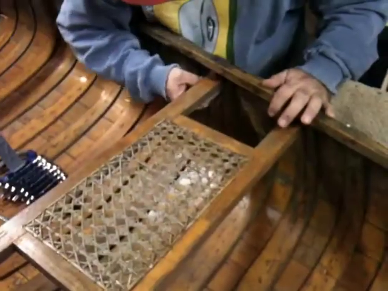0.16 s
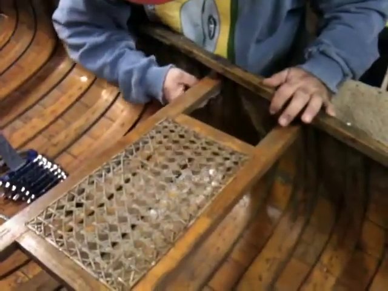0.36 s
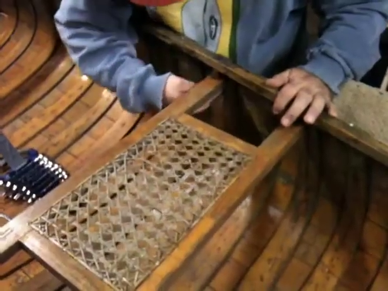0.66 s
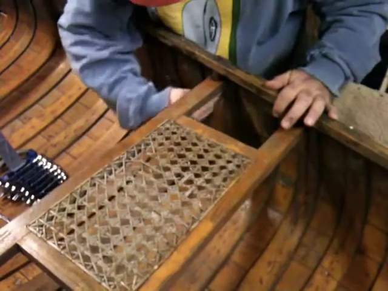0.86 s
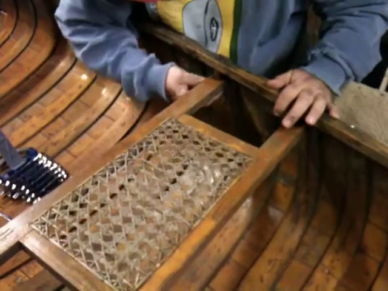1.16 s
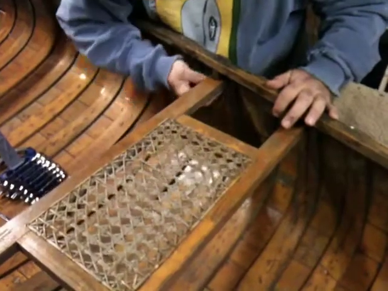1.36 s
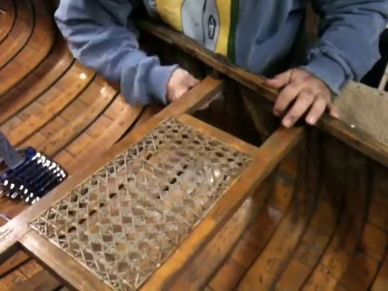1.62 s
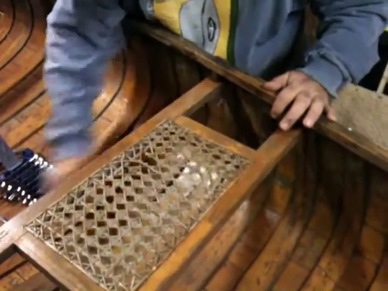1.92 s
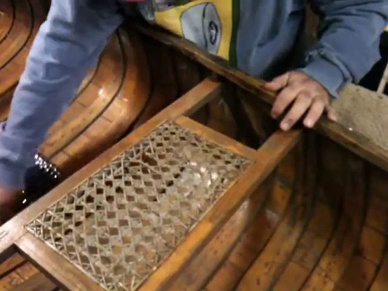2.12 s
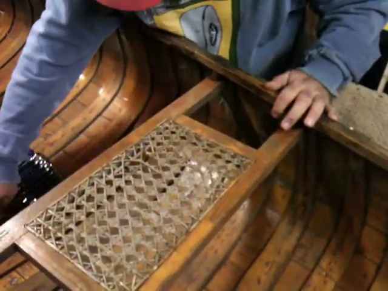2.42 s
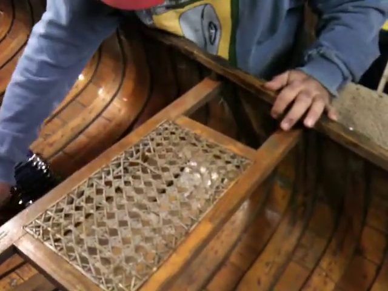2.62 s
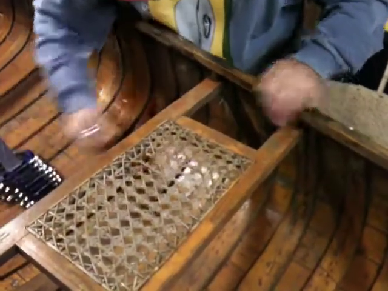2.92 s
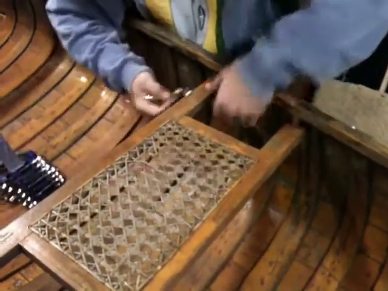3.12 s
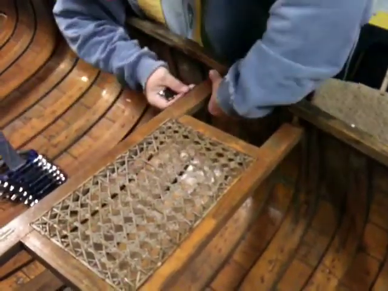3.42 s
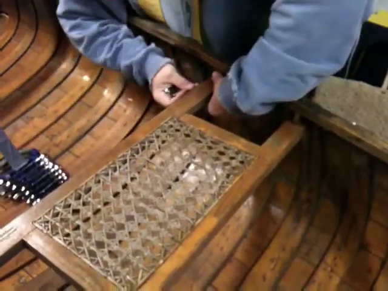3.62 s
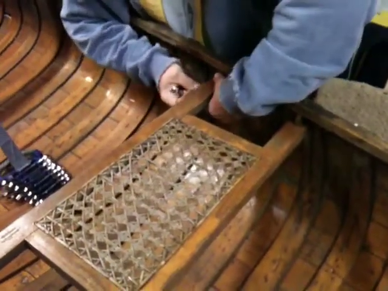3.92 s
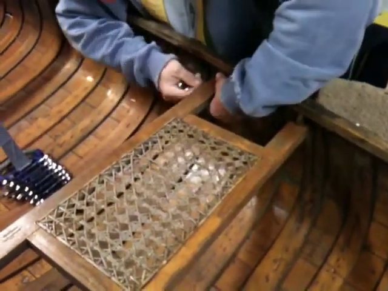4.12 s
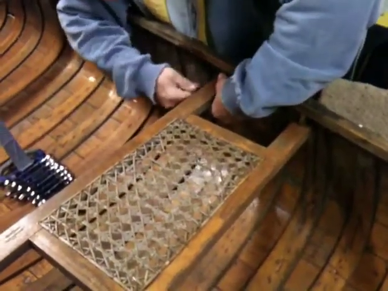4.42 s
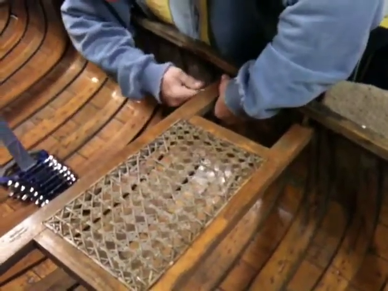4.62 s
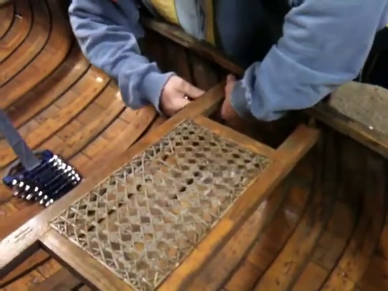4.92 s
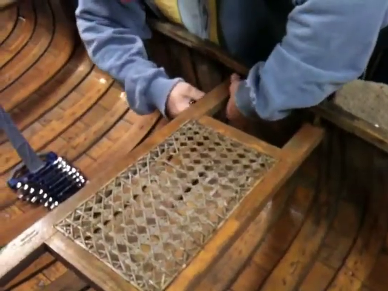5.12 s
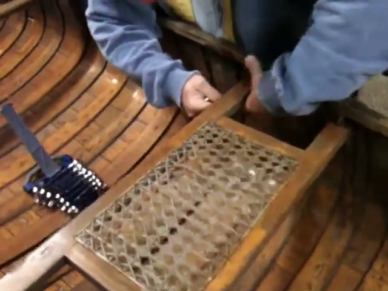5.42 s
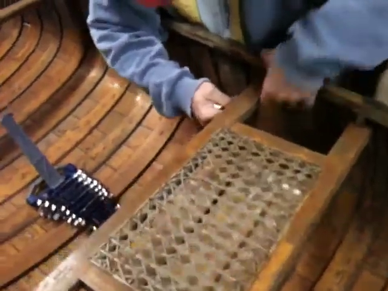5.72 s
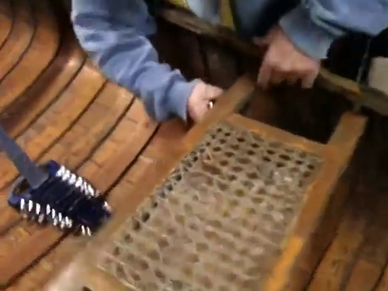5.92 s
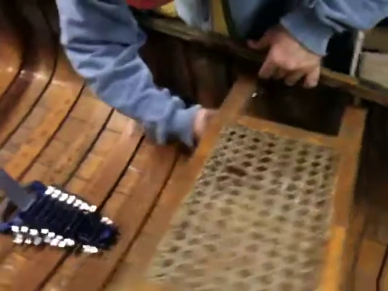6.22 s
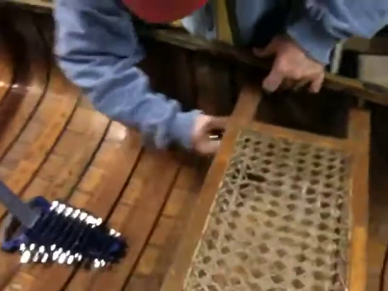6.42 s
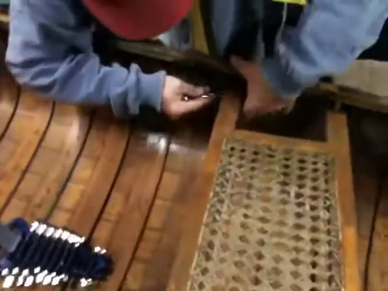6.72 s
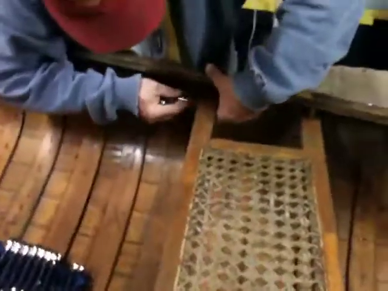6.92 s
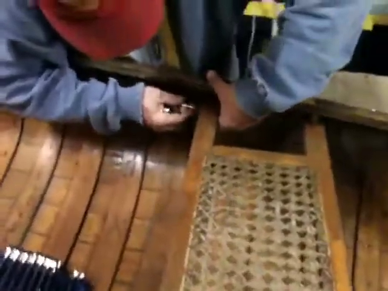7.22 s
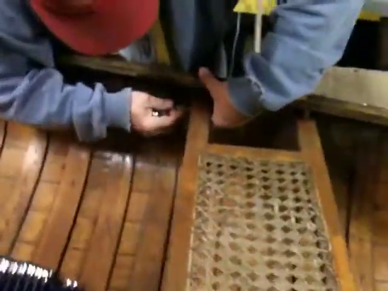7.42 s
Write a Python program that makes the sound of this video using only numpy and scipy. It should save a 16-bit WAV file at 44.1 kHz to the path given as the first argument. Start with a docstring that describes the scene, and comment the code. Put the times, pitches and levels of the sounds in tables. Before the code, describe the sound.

Close in a small workshop, a wooden frame knocks unevenly against a resonant planked hull. After faint taps and one firm knock, a flurry of knocks comes with a steel tool rattling out and clinking, peaking in a bright high ping. Sharp cracking knocks follow, then a quieter stretch of rustle and light taps, and finally another loose run of hard knocks. Sleeves brush the wood over faint room hiss.

```python
"""In a small workshop, a caned seat frame is being fitted into a wooden canoe.
The frame knocks against the planked hull: ringing tones, filtered noise, deep throbs and sharp snaps.
A steel wrench and a bolt are picked up, rattle and clink: each hit is a set of fading sine tones.
Sleeves brush over the wood: noise that follows the moving arm. A short echo and a quiet hiss with
soft drones make the room."""
import sys
import numpy as np
from scipy import signal
from scipy.io import wavfile

SR = 44100
rng = np.random.default_rng(int(sys.argv[2]) if len(sys.argv) > 2 else 0)


def unload_wav(signal):
    """Save mono or channel-first audio to the path in sys.argv[1] as 16-bit WAV at rate SR, clipped to [-1, 1]."""
    wavfile.write(
        sys.argv[1],
        SR,
        np.round(np.clip(np.atleast_2d(signal).T, -1, 1) * 32767).astype(np.int16),
    )


N = 333396
CENTRES = np.geomspace(34, 15000, 27)  # middles of the noise bands [Hz]
RING_N = SR // 2  # longest single sound [samples]
RING_TIME = np.arange(RING_N) / SR  # [s]


def from_db(db):
    """Turn decibels into a gain."""
    return 10 ** (np.asarray(db) / 20)


def rms_one(x):
    """Scale a sound to an average (rms) level of 1."""
    return x / np.sqrt(np.mean(x ** 2))


def at_hz(points, hz):
    """Read a table of (frequency, value) between its points, on a log-frequency axis."""
    f, value = np.transpose(points)
    return np.interp(np.log(hz), np.log(f), value)


def fade(t, t60):
    """Free decay: the sound is 60 dB down after t60 seconds."""
    return np.exp(-np.log(1000) * t / t60)


def add(out, s, sound):
    """Mix a sound in at s seconds."""
    start = int(s * SR)
    out[start:start + len(sound)] += sound[:N - start]


def noise_bands():
    """Make third-octave bands of unrelated noise, rms 1 each."""
    edge = np.sqrt(CENTRES[1] / CENTRES[0])
    bands = []
    for hz in CENTRES:
        band_filter = signal.butter(3, [hz / edge, hz * edge], "band", fs=SR, output="sos")
        bands.append(rms_one(signal.sosfilt(band_filter, rng.standard_normal(N))))
    return np.array(bands)


def coloured_noise(table, bands):
    """Mix the noise bands at the levels of a table."""
    return from_db(at_hz(table, CENTRES)) @ bands


def flutter(rate):
    """Random wobble around 0: straight lines between random points, `rate` points per second."""
    knots = rng.standard_normal(4096)
    return np.interp(np.arange(N) / SR * rate, np.arange(len(knots)), knots)


def resonate(x, hz, q):
    """A resonance passes the sound near one pitch, with gain 1 at its top."""
    return signal.lfilter(*signal.iirpeak(hz, q, fs=SR), x)


def ringing(modes, gains, length):
    """A struck object rings as decaying sines, each starting upward or downward at random."""
    hz, _, t60 = np.transpose(modes)
    signs = rng.choice([-1, 1], len(hz))
    sines = np.sin(2 * np.pi * hz[:, None] * RING_TIME)
    return (gains * signs) @ (sines * fade(RING_TIME, t60[:, None] * length))


# Blows of frame and hands on the hull: (time [s], body level [dB], clack re body [dB],
# crack re body [dB], resonance of the struck spot [Hz], its lift [dB])
KNOCKS = [(0.093, -66, 15.5, 5, 2060, 14.5), (0.386, -53, -15, -16, 178, 23),
          (0.56, -43, -6, -10.5, 990, 12.5), (.622, -42, -14, -14, 450, 0),
          (.894, -44, -1.5, -11, 422, 2.5), (1.015, -26, 1.5, 1, 392, 7), (1.021, -35.5, -11, -21, 182, 13),
          (1.223, -57, 2, -3, 210, 20), (1.367, -48, 4, -17, 1520, 3), (1.487, -63, -23, -20, 240, 19),
          (1.544, -55, -5, 2, 1170, 21), (1.62, -41, -0.5, -6, 1000, 16),
          (1.684, -38.5, -9.5, -0.5, 1050, 19), (2.156, -32.5, -17, -11.5, 232, 8.5),
          (2.171, -38, -2.5, -36, 1470, 9.5), (2.285, -41, -11.5, -1, 845, 18.5),
          (2.448, -42, 3.5, 12.5, 1390, 14), (2.483, -29.5, 3.5, 2.5, 850, 5), (2.512, -35, -1, 2, 660, 14),
          (2.556, -32, -3.5, -9, 1760, 11), (2.677, -35.5, -7.5, -5.5, 894, 13.5),
          (2.683, -35.5, -27, -26, 298, 18), (2.73, -40, -20, -30, 282, 8),
          (3.594, -44, -11, -7, 1050, 17.5), (3.851, -30, -1, 2, 507, 12), (3.881, -32, 0, 12, 387, 10),
          (3.887, -34.5, -4.5, 4.5, 744, 20.5), (3.9651, -28.5, -5, 6, 730, 6),
          (4.034, -28.5, 4.5, -3, 616, 2.5), (4.148, -54, 8, 19, 1070, 14),
          (4.394, -29, -13, -9, 884, 10.5), (4.398, -38, -10, -28, 235, 14), (5.117, -50, -18, -12, 260, 9),
          (5.324, -48.5, -18, -24.5, 545, 1), (5.601, -53, 2, -12.5, 1200, 10.5),
          (5.744, -46, -9.5, -6, 277, 13.5), (5.819, -37, -9.5, 1, 288, 2),
          (5.894, -36.5, -32, -37, 259, 13), (6.2302, -33.5, 7, 7, 970, 3), (6.26, -32.5, 2.5, -7, 374, 7),
          (6.321, -34.5, 5, -15, 370, 13.5), (6.335, -42.5, -2, -30, 650, 20.5),
          (6.396, -48.5, 10.5, -38, 513, 14.5), (6.697, -33, 2.5, 8, 432, 12),
          (6.722, -35, 0.5, 3.5, 434, 1), (6.846, -28.5, 1.5, 11, 433, 5.5),
          (7.02, -36, -4.5, -15, 254, 12.5), (7.085, -51.5, 5, 1, 594, 11),
          (7.308, -50.5, -2.5, -4, 221, 21.5), (7.359, -48, -3, -6, 201, 11),
          (7.456, -42, -0.5, -10, 268, 11)]
# Low modes of hull and frame: (frequency [Hz], level [dB], t60 when not held [s])
HULL_MODES = [(180.4, -10, 0.28), (228.4, 2.5, 0.11), (287, 5.5, 0.098), (313, 1.5, 0.14), (372, 7.5, 0.13),
              (397.5, 0, 0.11), (435.4, 1, 0.24), (508.6, -0.5, 0.33), (574, -0.5, 0.31),
              (616, -11.5, 0.18), (643.7, 1, 0.13), (726, -2.5, 0.25), (792, -3.5, 0.29),
              (889.5, 5.5, 0.14), (973.5, 4.5, 0.13), (1061, -9, 0.28), (1410, -10.5, 0.091),
              (1522, -18, 0.13), (1740, -5.5, 0.17), (2080, 3.5, 0.096), (2180, -9, 0.32)]
# Crowded higher modes of the planking: (frequency [Hz], level per band [dB])
PLANK_LEVELS = [(60, -22.5), (110, -25), (180, -2.5), (400, -2), (700, -4), (1200, 1), (2100, 0.5),
                (3300, -6), (4700, -5), (7000, -3.5), (9500, -4), (12000, -13.5), (15500, -17.5)]
# How long the planking rings: (frequency [Hz], t60 when not held [s])
PLANK_DECAY = [(100, 0.22), (260, 0.32), (700, 0.24), (1840, 0.21), (4850, 0.18), (12800, 0.1)]
HELD_RING = 0.91  # share of its ring time that the hull keeps under the hands


def knocks(bands, modes_db=-15, planks_db=-16.0, crack_db=5, crack_s=0.0065, swell_s=0.0028,
           swell_cycles=0.95, scatter_db=3.0, body_hz=450, clack_hz=1300, crack_hz=5500, spot_q=6.76):
    """Each blow rings the hull's low modes and the dense plank modes; harder contacts reach higher."""
    out, t = np.zeros(N), RING_TIME
    mode_hz, mode_db, _ = np.transpose(HULL_MODES)
    hz = CENTRES[:, None]
    # each band swells over a few cycles as it spreads through the hull
    swell = 1 - np.exp(-t * hz / swell_cycles)
    # the contact adds a short crack, strongest in the high bands
    crack = 1 + from_db(crack_db) * hz / (hz + 2000) * np.exp(-t / crack_s)
    shape = swell * crack * fade(t, at_hz(PLANK_DECAY, hz) * HELD_RING)
    for s, body_db, clack_db, crack_rel_db, spot_hz, lift_db in KNOCKS:
        force = [(body_hz, body_db), (clack_hz, body_db + clack_db), (crack_hz, body_db + crack_rel_db)]
        start = rng.integers(N - RING_N)
        dense = bands[:, start:start + RING_N] * shape
        # give every band the same energy as its shape, whatever piece of noise was drawn
        dense *= np.sqrt(np.sum(shape ** 2, axis=1) / np.sum(dense ** 2, axis=1))[:, None]
        planks = from_db(planks_db + at_hz(PLANK_LEVELS, CENTRES) + at_hz(force, CENTRES)) @ dense
        scatter = scatter_db * rng.standard_normal(len(mode_hz))
        strengths = from_db(modes_db + mode_db + at_hz(force, mode_hz) + scatter)
        low_modes = ringing(HULL_MODES, strengths, HELD_RING) * (1 - np.exp(-t / swell_s))
        blow = planks + low_modes
        # the struck spot colours the blow with a resonance of its own
        spot = (from_db(lift_db) - 1) * resonate(blow, spot_hz, spot_q)
        add(out, s, blow + spot)
    return out


def thumps(thump_db=-2, thump_hz=200, thump_t60=.035, radiate_hz=125):
    """Each blow also shoves the whole hull, which gives one short, heavy throb."""
    out = np.zeros(N)
    throb = np.sin(2 * np.pi * thump_hz * RING_TIME) * fade(RING_TIME, thump_t60)
    for s, body_db, *_ in KNOCKS:
        add(out, s, from_db(body_db + thump_db) * throb)
    # an open shell radiates little deep bass
    return signal.sosfilt(signal.butter(2, radiate_hz, "high", fs=SR, output="sos"), out)


# The frame slips off its bearing and a rail snaps: (time [s], level [dB], pitch [Hz])
SNAPS = [(1.0157, -27, 3040), (1.0147, -35, 4230), (3.851, -37.5, 2130), (3.882, -30, 2230),
         (3.9647, -30, 5030), (4.0347, -37.5, 5640), (6.2311, -34, 1510), (6.724, -33, 4800),
         (6.8438, -29.5, 4770)]


def snaps(q=10.0, t60=0.068):
    """A brief burst of slips, made of noise, rings one resonance of a rail."""
    out = np.zeros(N)
    for s, level_db, hz in SNAPS:
        noise = rng.standard_normal(RING_N)
        slips = rms_one(resonate(resonate(noise, hz, q / 2), hz, q / 2))
        add(out, s, from_db(level_db) * slips * fade(RING_TIME, t60))
    return out


# Touches of the wrench: (time [s], level [dB], most excited frequency [Hz],
# loss away from it [dB per octave], ring length [factor])
CLINKS = [(2.4485, -27, 7900, 26, 1.8), (2.467, -22, 8050, 32, 0.81), (2.553, -31, 12380, 5, 0.39),
          (2.5579, -20, 7900, 21, 0.4), (2.564, -30, 14000, 43, 0.56), (2.643, -25, 7300, 66, 0.099),
          (2.8176, -24, 11000, 2.5, 0.43), (3.09, -36, 10500, 4, 0.82), (3.227, -14, 8810, 15.5, 0.4),
          (3.327, -7.5, 9000, 65.5, .28), (3.5148, -37, 7700, 12, 0.32), (3.5807, -50.5, 4200, 10, 0.7),
          (3.7224, -43, 7900, 11, 0.31), (4.15, -42, 11570, -0.5, .62), (4.395, -44.5, 13630, 29, 0.6),
          (6.24, -27, 8050, 100, 0.35), (6.847, -18.5, 7900, 106, 0.4)]
# Ringing modes of the wrench: (frequency before detuning [Hz], level [dB], t60 before the factor [s])
WRENCH_MODES = [(3780, -11.5, 0.1), (4160, -3, .07), (4000, -13, 0.23), (4260, -18, 0.059),
                (4700, -16.5, .04), (7330, -17.5, 0.064), (7400, -16, 0.4), (7970, -1, 0.11),
                (7990, -6, 0.134), (8410, -14, 0.09), (8800, -25, .16), (9034, 2.5, 0.16),
                (10000, -14.5, 0.058), (9550, -11, .13), (10030, -10, 0.099), (11000, -11.5, 0.06),
                (11150, -3.5, 0.1134), (13080, -18.5, 0.078), (13240, -3, 0.16), (13820, -6, .09),
                (14780, -15, 0.11)]
# Colour of steel meeting steel: (frequency [Hz], level per band [dB])
TICK = [(50, -40.5), (700, -25), (2000, -26.5), (3100, -21), (4200, -5), (5500, -19.5), (7500, 0.5),
        (9300, 1.5), (12000, -3), (15000, -7.5)]
# tick re ring; the more a contact favours one mode, the less it ticks
TICK_DB, TICK_LOSS_OCTAVES = -4.5, 0.49
BOUNCE_S, BOUNCE_DB = 0.0084, -11.5  # one chatter after each touch: delay, level re the touch


def wrench(bands, ring_db=-2.0, tick_t60=0.043, most_loss_db=22, grip_detune=0.0028,
           scatter_db=4.0, contact_s=0.00085):
    """Steel on steel ticks, then rings the modes the contact favours, damped and detuned by the grip."""
    out, t = np.zeros(N), RING_TIME
    hz, mode_db, t60 = np.transpose(WRENCH_MODES)
    tick = rms_one(coloured_noise(TICK, bands))
    soft_start = 1 - np.exp(-t / contact_s)
    for s, level_db, focus_hz, slope_db, length in CLINKS:
        loss_db = np.minimum(slope_db * np.abs(np.log2(hz / focus_hz)), most_loss_db)
        tick_gain = from_db(TICK_DB - TICK_LOSS_OCTAVES * slope_db)
        for delay, touch_db in ((0, level_db), (BOUNCE_S, level_db + BOUNCE_DB)):
            gains = from_db(mode_db - loss_db + scatter_db * rng.standard_normal(len(hz)))
            gains /= np.linalg.norm(gains)
            held_hz = hz * (1 + grip_detune * rng.standard_normal(len(hz)))
            held_modes = np.column_stack([held_hz, mode_db, t60])
            ring = from_db(ring_db) * ringing(held_modes, gains, length)
            start = rng.integers(N - RING_N)
            contact = tick_gain * tick[start:start + RING_N] * fade(t, tick_t60)
            add(out, s + delay, from_db(touch_db) * (ring + contact) * soft_start)
    return out


RATTLE_START_S, RATTLE_S = 2.45, 0.14  # the wrench is dragged out from beside the bolt
# small contacts: number per second, level of the faintest, ring time [s]
RATTLE_PER_S, RATTLE_DB, RATTLE_T60 = 290, -49, 0.0094
RATTLE_LOW_HZ, RATTLE_HIGH_HZ = 2500, 7000  # range of their pitches


def rattle(size_db=4):
    """Dragged steel chatters on the planks: many tiny contacts, each a short ring at its own pitch."""
    out, t = np.zeros(N), np.arange(RING_N // 10) / SR
    for when, pitch, size in rng.random((int(RATTLE_PER_S * RATTLE_S), 3)):
        hz = RATTLE_LOW_HZ * (RATTLE_HIGH_HZ / RATTLE_LOW_HZ) ** pitch
        # many contacts are faint, a few are strong
        gain = from_db(RATTLE_DB - size_db * np.log(1 - size))
        ring = np.sin(2 * np.pi * hz * t) * fade(t, RATTLE_T60)
        add(out, RATTLE_START_S + when * RATTLE_S, gain * ring)
    return out


def hull_echoes(x, echo_db=-7, t60=0.14, delay_s=0.0038):
    """The varnished hull throws steel sounds back and forth (a fading noise tail), so they shimmer."""
    echoes = rng.standard_normal(RING_N) * fade(RING_TIME, t60) * (RING_TIME > delay_s)
    echoes /= np.linalg.norm(echoes)
    return x + from_db(echo_db) * signal.fftconvolve(x, echoes)[:N]


# Nudges of the loose bolt: (time [s], level [dB])
BOLT_HITS = [(2.4501, -26.5), (2.556, -52)]
# Ringing modes of the bolt: (frequency [Hz], level [dB], t60 [s])
BOLT_MODES = [(1560, -7.5, 0.19), (1710, -21, 0.12), (3876, -7.5, .1), (6143, -19.5, 0.46),
              (6330, -8.5, .33), (6440, -25, .17), (9500, -15, 0.13), (9500, 4.5, 0.24),
              (11865, -13.5, .18), (13200, -8.5, 0.14), (13350, -20, .13), (13740, -16.5, .14),
              (15284, -28, 0.16)]


def bolt():
    """The loose bolt is nudged and rings freely, as a set of fading sines."""
    out = np.zeros(N)
    mode_db = np.array(BOLT_MODES)[:, 1]
    for s, level_db in BOLT_HITS:
        add(out, s, ringing(BOLT_MODES, from_db(level_db + mode_db), 1))
    return out


MOVE_CREST, MOVE_ROUNDNESS = 0.39, 0.61  # share of a move at which it is fastest; how soft its ends are


def arm_speed(length):
    """A move gathers speed, crests at 1 and comes to rest."""
    count = int(length * SR)
    phase = np.interp(np.arange(count) / count, [0, MOVE_CREST, 1], [0, np.pi, 0])
    return np.sin(phase / 2) ** MOVE_ROUNDNESS


# fibres snag and let go: average rate, average size re the rustle, time constant of the decay
CATCHES_PER_S, CATCH_DB, CATCH_S = 57, -6, 0.0012


def catches():
    """Snagging fibres give short random flares of friction, as a gain that rises from 1."""
    snags = (rng.random(N) < CATCHES_PER_S / SR) * rng.exponential(1, N)
    flares = signal.lfilter([1], [1, -np.exp(-1 / (CATCH_S * SR))], snags)
    return 1 + from_db(CATCH_DB) * flares


# An arm slides or shifts its weight on the hull:
# (start time [s], length [s], sleeve rustle level [dB], hull rumble level [dB])
MOVES = [(.75, 0.45, -79, -67), (1.46, 0.36, -94, -58), (2.126, 0.37, -71, -60.5), (2.32, 0.42, -56.5, -61),
         (2.586, 0.32, -73, -52.5), (2.878, 0.25, -53, -55.5), (3.297, 0.19, -55, -60.5),
         (3.48, 0.26, -74.5, -63), (5.4, 0.13, -64.5, -57.5), (5.535, 0.21, -61.5, -59),
         (5.734, 0.19, -65, -54), (5.872, 0.16, -60.5, -65), (6.034, 0.32, -60.5, -61),
         (6.29, 0.2, -66.5, -61.5), (6.423, 0.087, -64.5, -68), (6.663, 0.34, -71.5, -53.5),
         (6.94, 0.5, -70, -61.5), (7.437, .12, -60.5, -55)]
# Light scuffs of fingers and cuffs: (time [s], level before the swell and fade [dB], fade time constant [s])
SCUFFS = [(0.088, -48.5, 0.021), (1.435, -62, 0.014), (3.375, -52, 0.0083), (3.424, -44.5, 0.01),
          (3.832, -54, 0.0099), (5.005, -52.5, 0.012), (5.413, -55.5, 0.05), (5.842, -56, 0.0038),
          (5.937, -53, 0.03), (6.177, -45, 0.021), (6.466, -47, 0.031), (7.15, -57, 0.009),
          (7.271, -54, 0.014)]
# Colour of the rubbing cloth: (frequency [Hz], level per band [dB])
CLOTH = [(50, -37), (500, -22), (1500, 1.5), (3000, -1.5), (5000, 1.5), (9000, 7), (12000, 1.5),
         (15500, -1)]
# Colour of the hull's answer: (frequency [Hz], level per band [dB])
RUMBLE = [(35, -48), (60, -31.5), (90, -11), (125, -11.5), (190, 9), (330, 7.5), (600, 2.5), (1200, -3),
          (2500, -21), (5000, -34.5)]
RESTING_RUSTLE_DB, RESTING_RUMBLE_DB = -76, -68  # hands that only hold on


def rubbing(bands, grain_db=1.0, lumps_db=3.5):
    """Cloth and skin catch in fine grains and the hull rumbles in lumps; both follow the arm's speed."""
    t = RING_TIME
    rustle = np.full(N, from_db(RESTING_RUSTLE_DB))
    rumble = np.full(N, from_db(RESTING_RUMBLE_DB))
    for s, length, rustle_db, rumble_db in MOVES:
        speed = arm_speed(length)
        add(rustle, s, from_db(rustle_db) * speed)
        add(rumble, s, from_db(rumble_db) * speed)
    for s, level_db, length in SCUFFS:
        swell = 1 - np.exp(-4.0 * t / length)
        add(rustle, s, from_db(level_db) * swell * np.exp(-t / length))
    grains = from_db(grain_db * flutter(240)) * catches()
    cloth = rms_one(coloured_noise(CLOTH, bands)) * grains
    hull = rms_one(coloured_noise(RUMBLE, bands)) * from_db(lumps_db * flutter(25))
    return rustle * cloth + rumble * hull


def workshop(x, wet_db=-17, t60=0.22, delay_s=0.011, wall_hz=5000):
    """The walls send back a short tail of fading noise, dulled above wall_hz."""
    tail = rng.standard_normal(RING_N) * fade(RING_TIME, t60) * (RING_TIME > delay_s)
    tail /= np.linalg.norm(tail)
    tail = signal.sosfilt(signal.butter(1, wall_hz, fs=SR, output="sos"), tail)
    return x + from_db(wet_db) * signal.fftconvolve(x, tail)[:N]


# Colour of the steady room hiss: (frequency [Hz], level per band [dB])
ROOM = [(35, -112), (55, -101), (85, -88), (130, -78.5), (250, -73.5), (600, -72.5), (1300, -72),
        (2000, -72.5), (3000, -79.5), (5000, -80.5), (8000, -79), (12000, -81), (15500, -82)]
# Pitches at which the room tone drones: (frequency [Hz], level [dB])
DRONE = [(120, -79), (176, -73), (365, -77), (563, -73.5), (1970, -76.5)]


def room_tone(drone_q=25):
    """Even hiss, with soft drones made by passing noise through narrow resonances."""
    out = coloured_noise(ROOM, noise_bands())
    for hz, level_db in DRONE:
        noise = rng.standard_normal(N)
        drone = resonate(resonate(noise, hz, drone_q), hz, drone_q)
        out += from_db(level_db) * rms_one(drone)
    return out


def scene():
    """Knocks, clinks and rubbing over the room tone."""
    bands = noise_bands()
    wood = knocks(bands) + thumps() + snaps()
    steel = hull_echoes(wrench(bands) + rattle()) + bolt()
    mix = workshop(wood + steel) + rubbing(bands) + room_tone()
    return mix[None]  # one channel


def record(dry, bass_hz=30, cutoff_hz=15500):
    """The microphone thins the deep bass, and the top is cut steeply."""
    thin = signal.sosfilt(signal.butter(1, bass_hz, "high", fs=SR, output="sos"), dry)
    return signal.sosfilt(signal.ellip(10, .3, 80, cutoff_hz, fs=SR, output="sos"), thin)


dry = scene()
out = record(dry)
unload_wav(out)
```